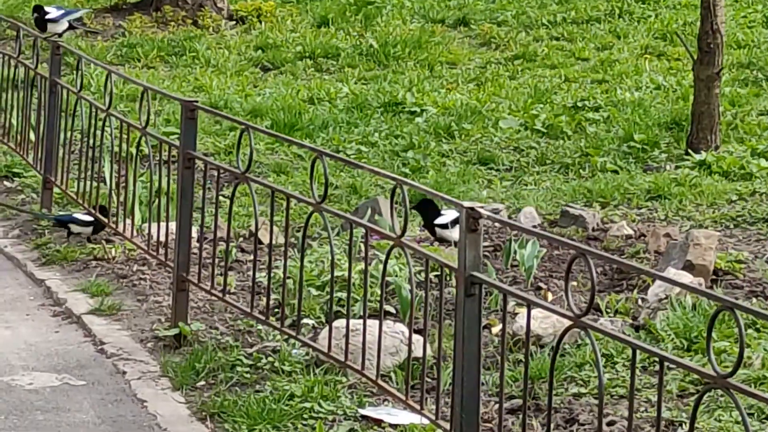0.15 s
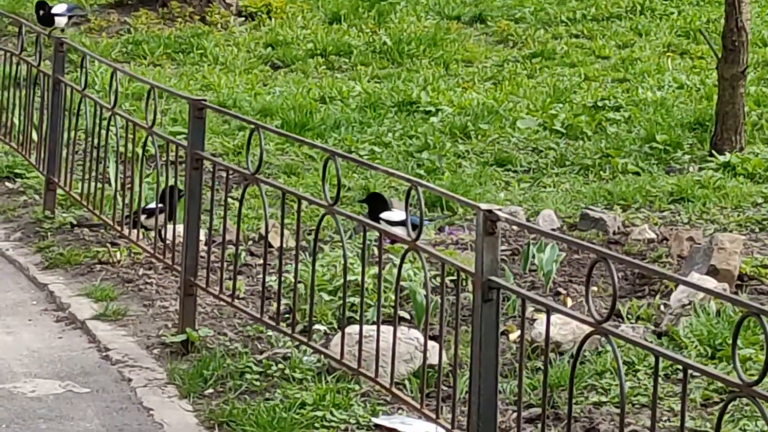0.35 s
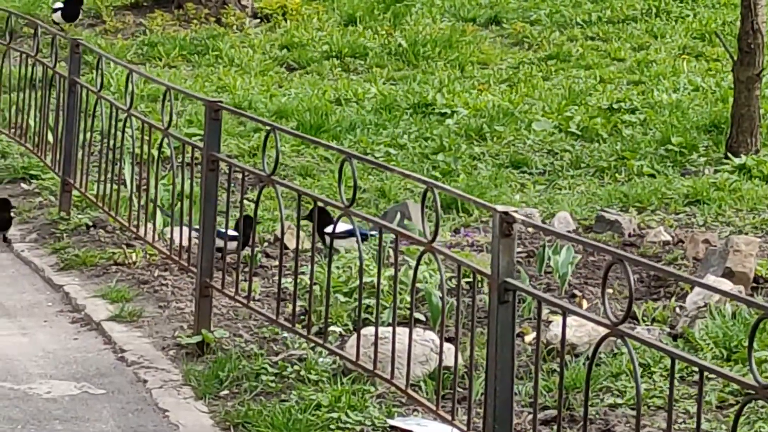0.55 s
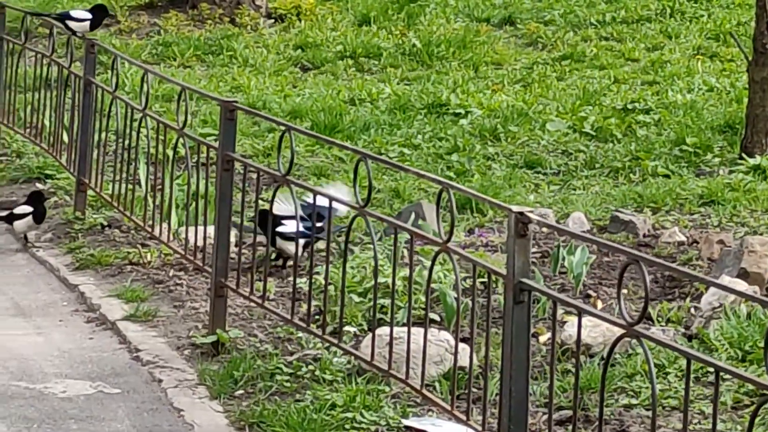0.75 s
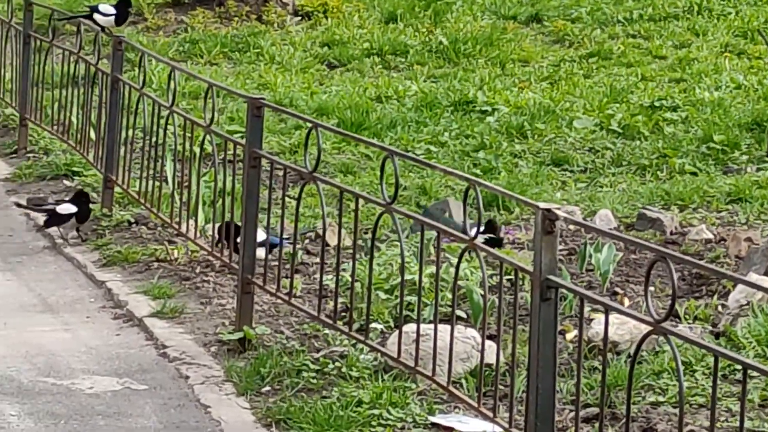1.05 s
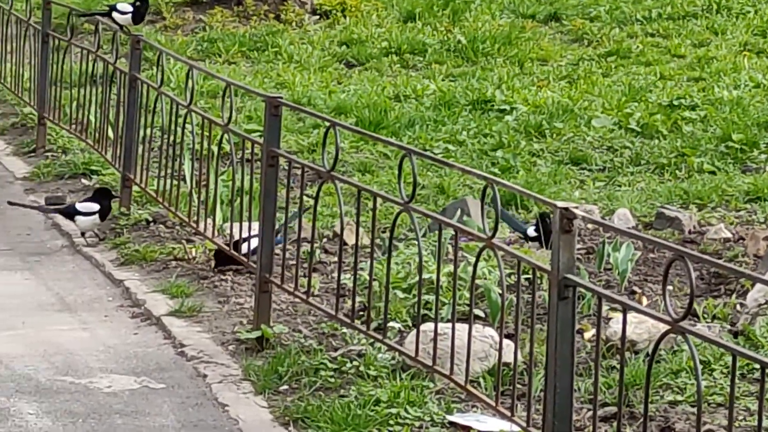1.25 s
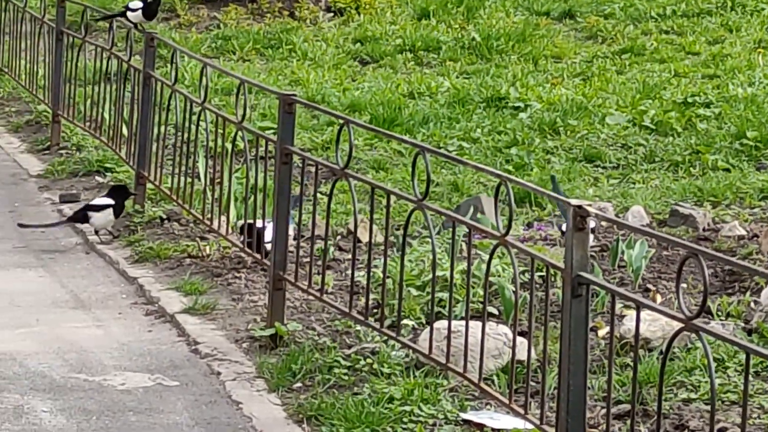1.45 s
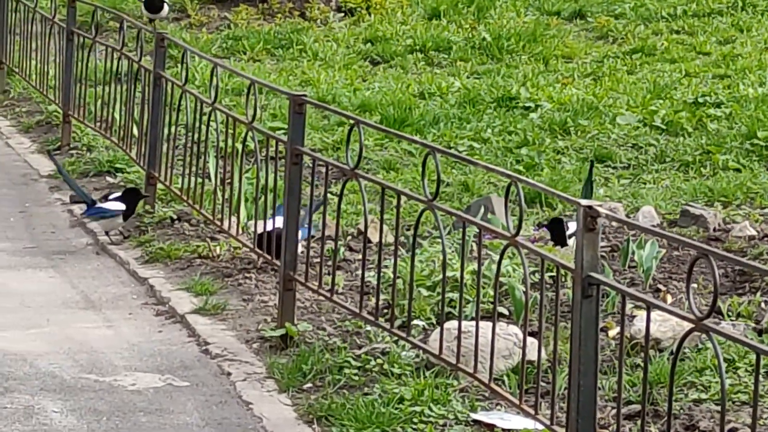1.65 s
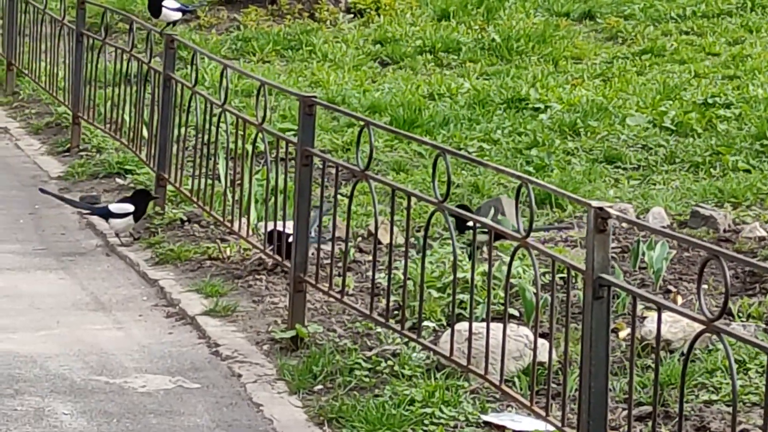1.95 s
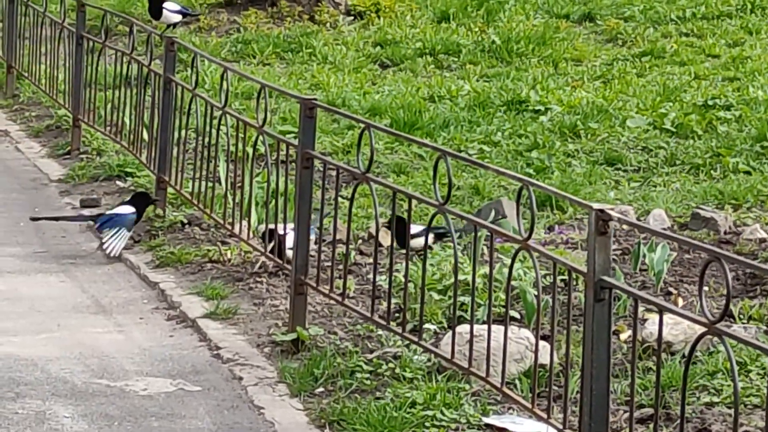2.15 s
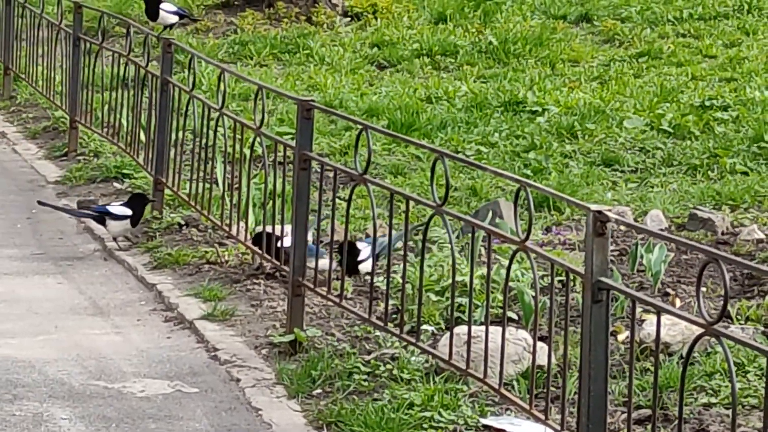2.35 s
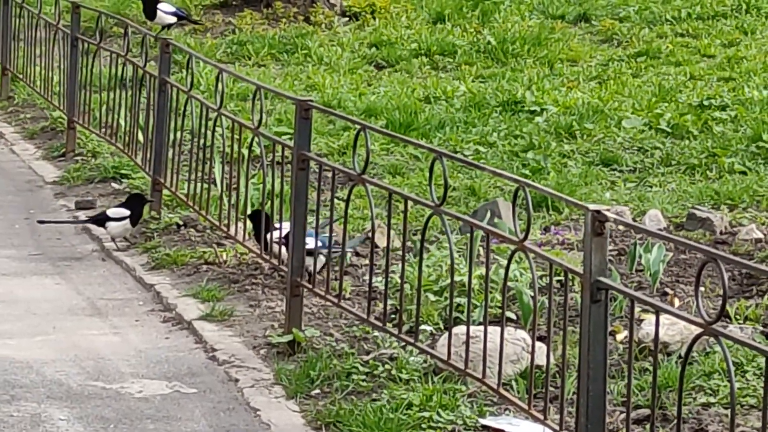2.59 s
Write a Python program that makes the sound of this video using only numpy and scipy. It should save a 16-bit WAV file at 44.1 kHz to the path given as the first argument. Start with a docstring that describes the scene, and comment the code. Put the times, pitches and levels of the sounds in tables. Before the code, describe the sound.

Magpies chatter in short, dry, harsh notes grouped in quick runs, many later notes opened by a tiny clear squeak; yard walls scatter echoes, with a vehicle rumble fading beneath a soft town hush, in stereo.

```python
"""A town's steady hush and a vehicle drawing away: shaped noise, a low engine sine and an exhaust beat.
Over it several magpies chatter in a yard: short harsh notes in runs of two to five, an uneven pulse train
and breath ringing throat and beak resonances. Walls throw the calls back as scattered, decaying echoes.
From about half a second on, many notes are opened by a brief clear squeak, a gliding tone with overtones."""
import sys
import numpy as np
from scipy import signal
from scipy.fft import rfft, irfft
from scipy.io import wavfile
from scipy.ndimage import map_coordinates

SR = 44100
rng = np.random.default_rng(int(sys.argv[2]) if len(sys.argv) > 2 else 0)


def undo_db(level):
    """Turn decibels back into plain size, where 20 dB means ten times bigger."""
    steps = np.asarray(level, float) / 20
    return 10 ** steps


def digitize_waveform(pressure):
    """Quantize a signal to 16-bit integers and store it at the path in sys.argv[1].

    Rows of a 2-D input are taken as channels; values are limited to [-1, 1].
    """
    field = np.atleast_2d(pressure).T
    bounded = np.clip(field, -1, 1)
    quanta = np.round(bounded * 32767).astype(np.int16)
    wavfile.write(sys.argv[1], SR, quanta)


N = 119952


def at_hz(points, hz):
    """Read a table on a log-frequency axis."""
    table_hz, value = np.transpose(points)
    return np.interp(np.log(hz), np.log(table_hz), value)


def rms_one(x):
    """Scale to rms 1."""
    return x / np.sqrt(np.mean(x ** 2) + 1e-20)


def in_time(rows):
    """Columns of a curve at every sample."""
    s, *columns = np.transpose(rows)
    return [np.interp(np.arange(N) / SR, s, c) for c in columns]


def drift(rate_hz):
    """Slow random wander, spread 1: twice-smoothed noise made at SR / 40."""
    r = np.exp(-2 * np.pi * rate_hz * 40 / SR)
    slow = signal.lfilter([1], [1, -2 * r, r * r], rng.standard_normal(N // 40 + 2002))[2000:]
    return np.interp(np.arange(N) / 40, np.arange(len(slow)), rms_one(slow))


# left-right correlation of the town noise: (frequency [Hz], correlation [-1..1])
TOWN_LIKENESS = [(40, 0.78), (90, 1), (300, 0.76), (700, 0)]


def banded_noise(spectrum, patchy_db):
    """Half-octave bands of stereo noise, each with its own level, flicker and likeness; rms 1."""
    out = 0
    edges_hz = 22 * 2 ** np.arange(0, 9.6, .5)
    white = rng.standard_normal((2, 2, N))
    for k, (low, high) in enumerate(zip(edges_hz, edges_hz[1:])):
        band = signal.butter(2, [low, high], "band", fs=SR, output="sos")
        mid, side = signal.sosfilt(band, white[k % 2])
        hz = np.sqrt(low * high)
        alike = np.clip(at_hz(TOWN_LIKENESS, hz), -1, 1)
        level = undo_db(at_hz(spectrum, hz) + patchy_db * drift(6.9))
        stereo = np.sqrt(1 + alike) * mid + np.sqrt(1 - alike) * side * [[1], [-1]]
        out = out + level * stereo
    return rms_one(out)


# relative spectrum of the town: (frequency [Hz], density [dB per Hz])
HUSH_SPECTRUM = [(240, -12), (420, -3), (900, 0), (1500, -4), (3000, -15), (6000, -26), (9000, -33),
                 (15000, -52)]


def town_hush():
    """Steady broadband noise of many far sources, strongest near 900 Hz."""
    return undo_db(-44) * banded_noise(HUSH_SPECTRUM, patchy_db=1.5)


# road rumble: (time [s], level [dB])
RUMBLE_LEVEL = [(0, -33), (.12, -29), (.8, -32), (1, -29.5), (1.2, -35), (1.5, -37), (2.1, -39),
                (2.72, -40)]
# relative spectrum of the rumble: (frequency [Hz], density [dB per Hz])
RUMBLE_SPECTRUM = [(30, -36), (60, -31), (85, -1.5), (125, 1), (180, -0.5), (310, -2), (500, -8),
                   (900, -19.5), (1400, -49)]
# engine note before its waver: (time [s], pitch [Hz], level [dB])
ENGINE_NOTE = [(0, 87.4, -60), (.15, 88.3, -38), (.45, 86, -53), (.68, 86.9, -35.5), (.85, 84.84, -47),
               (1.15, 84.7, -33.5), (1.45, 83.2, -38.5), (1.7, 81.5, -47), (2.72, 83, -57)]
# exhaust beat, each harmonic before its waver: (time [s], level [dB])
EXHAUST_LEVEL = [(.7, -47.5), (.95, -42), (1.2, -41), (1.7, -79)]
EXHAUST_HZ = 38.42


def vehicle():
    """A fading road rumble, the engine's low wavering sine and a passing exhaust beat of harmonics 3 to 8."""
    rumble_db, = in_time(RUMBLE_LEVEL)
    engine_hz, engine_db = in_time(ENGINE_NOTE)
    engine_turn = 2 * np.pi * np.cumsum(engine_hz) / SR
    engine = np.sqrt(2) * undo_db(engine_db + 2.5 * drift(9)) * np.sin(engine_turn)
    exhaust_db, = in_time(EXHAUST_LEVEL)
    exhaust_turn = 2 * np.pi * EXHAUST_HZ * np.arange(N) / SR
    exhaust = sum(undo_db(3 * drift(5)) * np.sin(k * exhaust_turn + k) for k in range(3, 9))
    rumble = undo_db(rumble_db) * banded_noise(RUMBLE_SPECTRUM, patchy_db=1.5)
    return rumble + engine + undo_db(exhaust_db) * exhaust


def resonate(x, rows):
    """Parallel resonances, each applied twice, signs alternating."""
    out = 0
    for k, (hz, width_hz, db) in enumerate(rows):
        r = np.exp(-np.pi * width_hz / SR)
        b = (1 - r * r) / 2 * np.array([1, 0, -1])
        a = [1, -2 * r * np.cos(2 * np.pi * hz / SR), r * r]
        twice = signal.lfilter(b, a, signal.lfilter(b, a, x))
        out = out + (-1) ** k * undo_db(db) * twice
    return out


def swell(t, length_s):
    """Bell-shaped rise to the peak at t = 0, slower bell-shaped fall."""
    rise_share = .34
    return np.exp(-(t / (length_s * np.where(t < 0, rise_share, 1 - rise_share))) ** 2)


MEDIAN_PULSE_HZ, GAP_SPREAD, PULSE_SPREAD_DB = 801.1, .3, 1.5  # GAP_SPREAD in log units


def syrinx():
    """Chaotic flutter: uneven pulses of uneven size, and turbulent air let through at each opening."""
    gaps = SR / MEDIAN_PULSE_HZ * np.exp(GAP_SPREAD * rng.standard_normal(4000))
    at = np.cumsum(gaps).astype(int)
    size = undo_db(PULSE_SPREAD_DB * rng.standard_normal(4000))
    pulses = np.zeros(N)
    pulses[at[at < N]] = size[at < N]
    air = signal.lfilter([1], [1, -.97], pulses) * rng.standard_normal(N)
    return rms_one(pulses), rms_one(air)


# harsh notes: (peak time [s], beak resonance [Hz], level [dB],
#               second, middle and top resonance gains over that level [dB])
HARSH_NOTES = [(0.005, 5570, -35, -2, -4, -10), (0.074, 5080, -30.5, -2.5, -4.5, -13.5),
               (0.19, 4510, -37, 1.5, -1, -9.5), (0.287, 5770, -41, 2.5, 1.5, -0.5),
               (0.364, 5230, -36, 3.5, 0, 0), (0.428, 5000, -34.5, -7.5, -8.5, -27),
               (0.495, 4760, -33, -4, -1, -13.5), (0.583, 5010, -42.5, 5, 6.5, -4.5),
               (0.718, 4330, -42, 6.5, 0.5, -6), (0.791, 4340, -39.5, 6, -1, -8),
               (0.875, 4310, -39.5, 7, 2, -6), (0.952, 4320, -34.5, -3.5, -8.5, -10),
               (1.016, 4260, -32, -1, -4.5, -8), (1.242, 4300, -32.5, -5, -12.5, -18.5),
               (1.312, 3750, -33.5, -3.5, -8.5, -23), (1.406, 4180, -33, -4.5, -9.5, -16),
               (1.517, 5180, -44, 2.5, 5.5, -2), (1.589, 4720, -35, -2.5, 0, -9.5),
               (1.657, 4230, -34, -2, -6.5, -11), (1.683, 4720, -43, 1.5, 1.5, -1.5),
               (1.881, 3880, -34.5, -5, -7, -8), (1.951, 3940, -35, -1.5, -7, -8),
               (2.038, 4440, -35, 0, -4, -9.5), (2.181, 4590, -35.5, -2.5, -3.5, -10.5),
               (2.252, 4700, -35.5, 3.5, 1.5, -2.5), (2.421, 4050, -34, -6.5, -6, -12.5),
               (2.491, 4630, -34.5, -3.5, -6, -10.5), (2.575, 4280, -38.5, -1.5, 0.5, -12),
               (2.617, 4900, -49, 2.5, 2.5, 3.5)]
# throat and beak resonances before each note's slide: (frequency [Hz], width [Hz], relative level [dB])
FIRST_RESONANCES = [(1620, 490, 1), (850, 370, -19.5)]
SECOND_RESONANCES = [(2355, 360, 2.5), (2998, 585, -6)]
MIDDLE_RESONANCES = [(3880, 750, -11.5), (5756, 240, -14), (6620, 730, -14)]
TOP_RESONANCES = [(8600, 1300, -4), (9920, 470, -11), (11700, 1470, -9)]
LOW_BREATH_SHARE, HIGH_BREATH_SHARE = 0.5, 0.96  # shares of power
NOTE_S, UPPER_LEAD_S, UPPER_STRETCH = 0.03496, 0.004, 1.15
SAG, THROAT_SPREAD = .06, .03  # slide through a note, spread between notes: shares of frequency
BEAK_WIDTH_HZ, BEAK_DB = 900, -1  # BEAK_DB is over the middle gain
COLOUR_SPREAD_DB = 3


def chacks():
    """Flutter drives the resonances; upper ones are breathier, lead slightly and follow the beak's gape."""
    pulses, air = syrinx()
    low, high = [np.sqrt(1 - share) * pulses + np.sqrt(share) * air
                 for share in (LOW_BREATH_SHARE, HIGH_BREATH_SHARE)]
    upper_rows = MIDDLE_RESONANCES + TOP_RESONANCES
    group_sizes = [len(MIDDLE_RESONANCES), len(TOP_RESONANCES)]
    rings = [rms_one(resonate(low, rows)) for rows in (FIRST_RESONANCES, SECOND_RESONANCES)]
    for k, row in enumerate(upper_rows):
        rings.append((-1) ** k * rms_one(resonate(high, [row])) * undo_db(row[2]))
    out, now = np.zeros(N), np.arange(N) / SR
    chance = rng.standard_normal((len(HARSH_NOTES), 1 + len(upper_rows)))
    for note, (throat, *colour) in zip(HARSH_NOTES, chance):
        s, beak_hz, db, second_db, middle_db, top_db = note
        i = np.flatnonzero(abs(now - s) < .1)
        t = now[i] - s
        start = max(i[0] - 900, 0)
        # a varying read speed slides the resonances down
        slide = THROAT_SPREAD * throat - SAG * np.clip(t / NOTE_S, -1, 1)
        read = i - start + np.cumsum(slide)
        group_db = np.repeat([middle_db, top_db], group_sizes)
        weights = undo_db(COLOUR_SPREAD_DB * np.array(colour) + group_db)
        near = [ring[start:i[-1] + 900] for ring in rings]
        sources = near[:2] + [weights @ near[2:]]
        first, second, upper = [map_coordinates(x, [read], order=3, mode="mirror") for x in sources]
        beak = undo_db(middle_db + BEAK_DB) * rms_one(resonate(high[i], [(beak_hz, BEAK_WIDTH_HZ, 0)]))
        low_part = swell(t, NOTE_S) * (first - undo_db(second_db) * second)
        high_part = swell(t + UPPER_LEAD_S, NOTE_S * UPPER_STRETCH) * (upper + beak)
        out[i] += undo_db(db) * (low_part + high_part)
    return out


ECHO_T60_S, ECHO_BUILD_S, ECHO_TREBLE_DB = .36, 0.017, -0.5


def yard(x):
    """Scattered echoes from walls and ground, different on each side: decaying noise, treble a little weaker."""
    t = np.arange(int(.6 * SR)) / SR
    tail = rng.standard_normal((2, len(t))) * undo_db(-60 * t / ECHO_T60_S) * np.clip(t / ECHO_BUILD_S, 0, 1)
    tail = tail / np.sqrt(np.sum(tail ** 2) / 2)
    treble = signal.sosfilt(signal.butter(2, 3500, "high", fs=SR, output="sos"), x)
    sent = x + (undo_db(ECHO_TREBLE_DB) - 1) * treble
    return signal.fftconvolve(sent[None], tail, axes=1)[:, :N]


# left over right for the birds: (frequency [Hz], level [dB])
BIRD_BALANCE = [(1600, 4.5), (2400, 1.5), (4400, -2), (5500, 7.5), (8500, 13), (12500, -16)]
# left ahead of right for the birds: (frequency [Hz], phase [rad])
BIRD_PHASE = [(1000, -0.34), (2900, -0.86), (4600, 2.21), (12000, 1.22)]


def two_ports(x):
    """The two microphone ports hear the birds with different colour and phase."""
    hz = np.maximum(np.arange(N // 2 + 1) * SR / N, 1)
    left = undo_db(at_hz(BIRD_BALANCE, hz) / 2) * np.exp(.5j * at_hz(BIRD_PHASE, hz))
    return irfft(rfft(x) * np.array([left, 1 / left]), N)


# clear squeaks before the waver: (start time [s], start pitch [Hz], end pitch [Hz], level [dB],
#                                  overtone drive over that level [dB])
CLEAR_SQUEAKS = [(0.466, 1494, 1676, -30, -29), (0.687, 1900, 2100, -38, -2), (0.76, 1507, 1714, -32.5, -8),
                 (0.983, 2730, 3050, -34, -21), (1.211, 1815, 2110, -43.5, 1.5),
                 (1.278, 1456, 1678, -28, -17), (1.487, 2450, 2000, -51, 17), (1.564, 1600, 1694, -35, -4),
                 (1.622, 1540, 1600, -30, -16), (1.849, 1750, 2064, -46, 8), (1.922, 1547, 1643, -29.5, -6),
                 (2.152, 2030, 1962, -52, 7), (2.219, 1468, 1620, -29, -4),
                 (2.389, 1890, 1966, -52.5, 18.5), (2.456, 1520, 1617, -30.5, -7.5),
                 (2.684, 3510, 2590, -41.5, -20)]
# resonances on the overtones: (frequency [Hz], width [Hz], level [dB])
OVERTONE_RESONANCES = [(4100, 500, -3), (4950, 500, -1), (6300, 900, -9), (8250, 330, -1.5)]
SQUEAK_CYCLES, SQUEAK_WAVER = 42, 0.006  # cycles of the start pitch, share of pitch


def squeaks():
    """A gliding, slightly unsteady tone of a few dozen cycles; resonances pick out some overtones."""
    tone, overtones = np.zeros(N), np.zeros(N) + 1e-18
    waver = 1 + SQUEAK_WAVER * drift(110)
    for s, from_hz, to_hz, db, overtones_db in CLEAR_SQUEAKS:
        length_s = SQUEAK_CYCLES / from_hz
        i = np.arange(int(s * SR), min(N, int((s + length_s) * SR)))
        done = np.clip((i / SR - s) / length_s, 0, 1)
        glide = 1 - (1 - done) ** 2 if to_hz > from_hz else done ** 2  # rises level off, falls start late
        hz = (from_hz + (to_hz - from_hz) * glide) * waver[i]
        turn = 2 * np.pi * np.cumsum(hz) / SR
        shape = undo_db(db) * np.sin(np.pi * done ** .9)
        tone[i] += shape * np.sin(turn)
        harmonics = sum(np.sin(k * turn) for k in range(2, 7) if k * from_hz < 14000)
        overtones[i] += undo_db(overtones_db) * shape * harmonics
    return tone, resonate(overtones, OVERTONE_RESONANCES)


ECHO_DB, OVERTONE_ECHO_DB = -3.5, -7  # the overtones take both
TOWN_LEFT_DB = 0.41  # up on the left, down on the right


def scene():
    """Town, birds and their echoes, in stereo."""
    tone, overtones = squeaks()
    birds = chacks() + tone
    echoes = undo_db(ECHO_DB) * yard(birds + undo_db(OVERTONE_ECHO_DB) * overtones)
    town = vehicle() + town_hush()
    return two_ports(birds + overtones + echoes) + town * undo_db([[TOWN_LEFT_DB], [-TOWN_LEFT_DB]])


def low_pass(x):
    """Removes everything above the highest recorded frequency."""
    return signal.sosfilt(signal.butter(12, 15730, fs=SR, output="sos"), x)


def record(dry):
    """Deliver the finished mix."""
    return low_pass(dry)


dry = scene()
out = record(dry)
digitize_waveform(out)
```